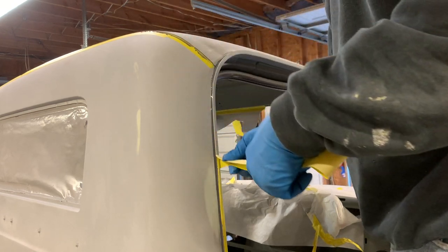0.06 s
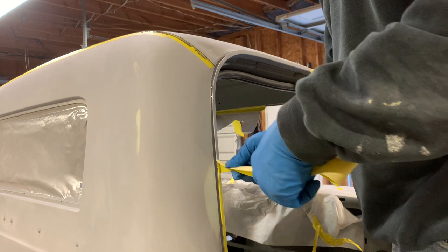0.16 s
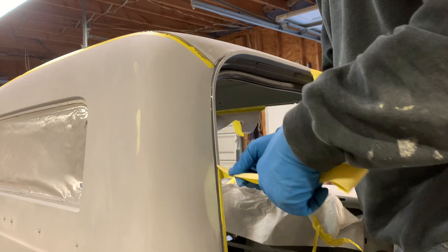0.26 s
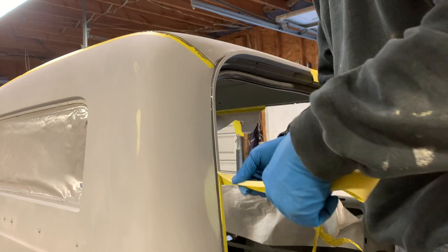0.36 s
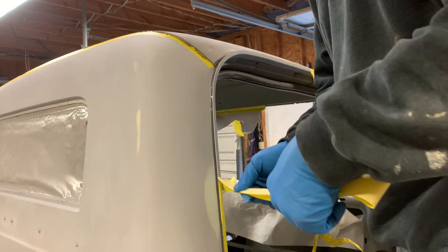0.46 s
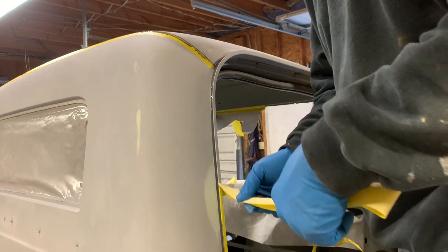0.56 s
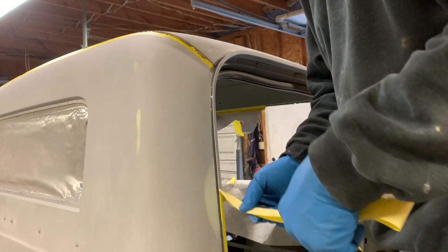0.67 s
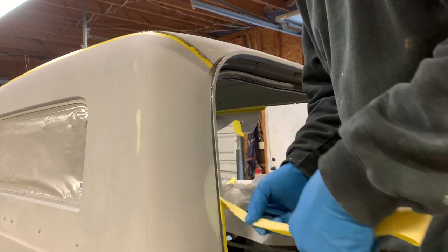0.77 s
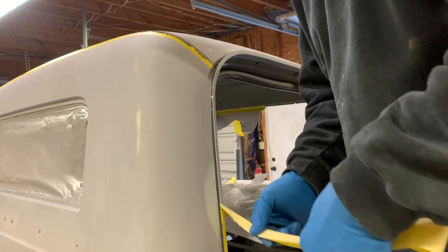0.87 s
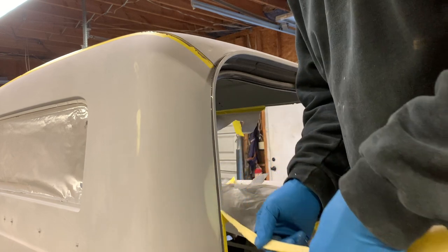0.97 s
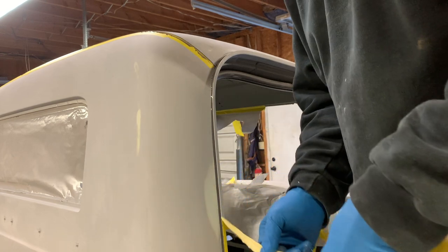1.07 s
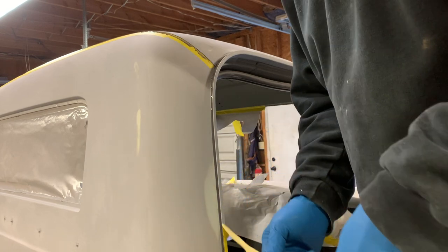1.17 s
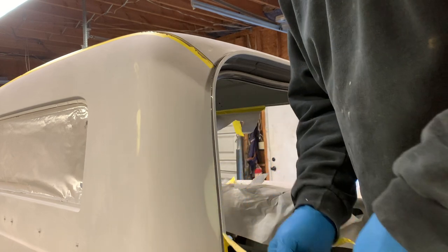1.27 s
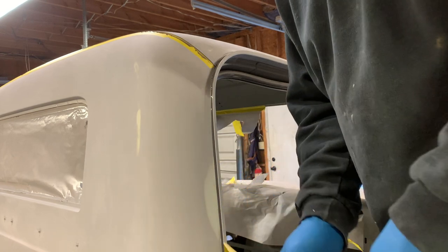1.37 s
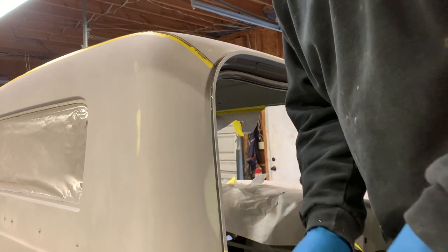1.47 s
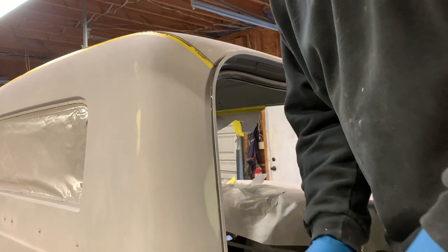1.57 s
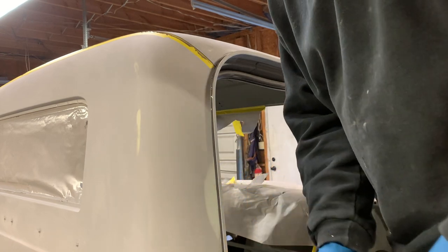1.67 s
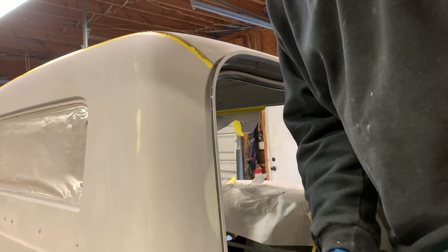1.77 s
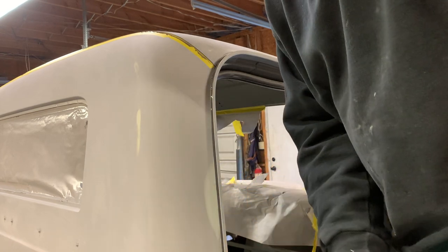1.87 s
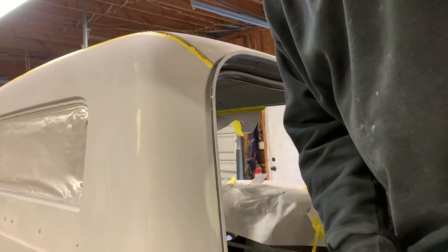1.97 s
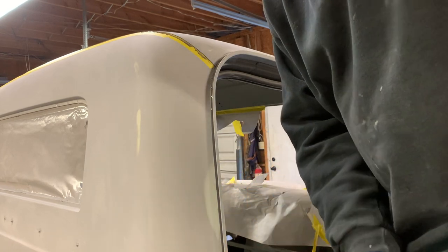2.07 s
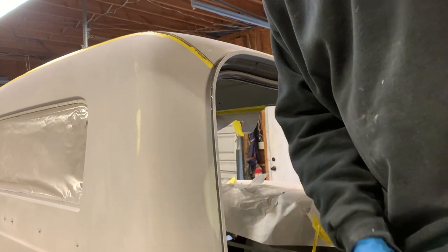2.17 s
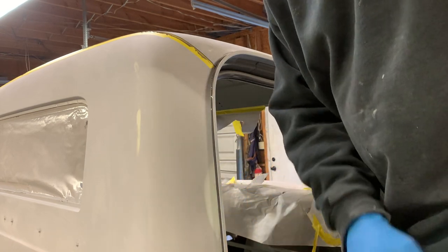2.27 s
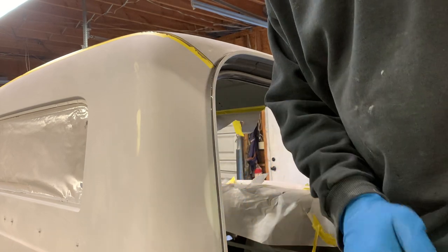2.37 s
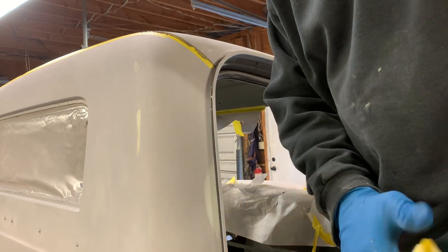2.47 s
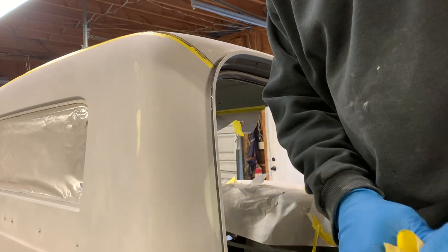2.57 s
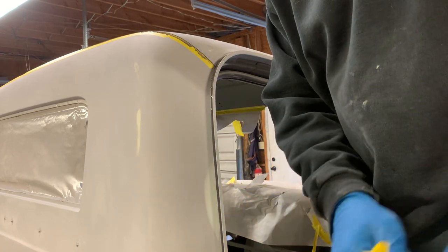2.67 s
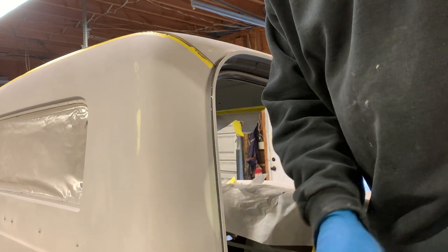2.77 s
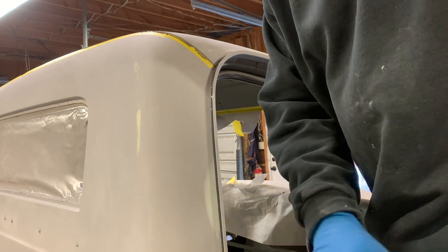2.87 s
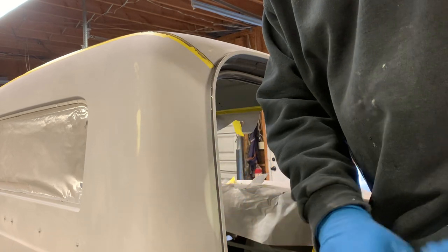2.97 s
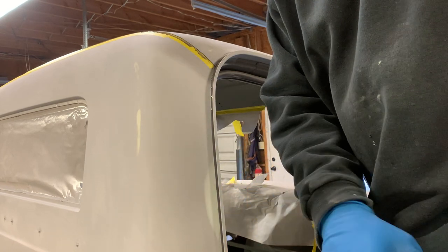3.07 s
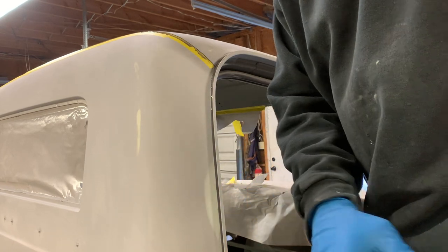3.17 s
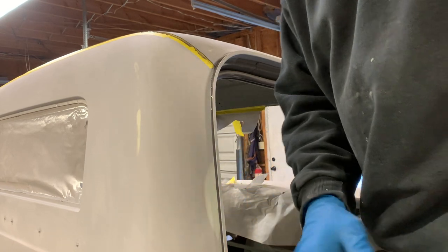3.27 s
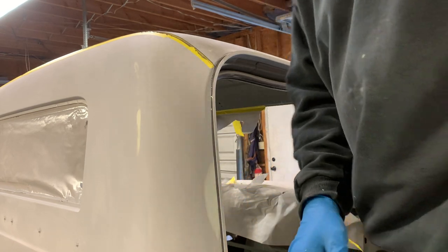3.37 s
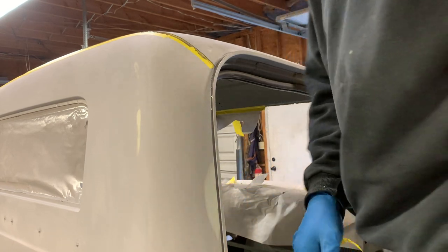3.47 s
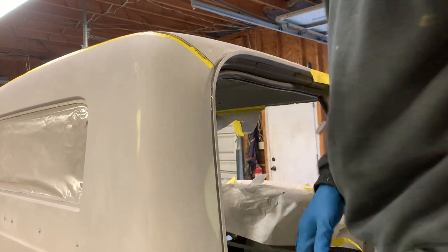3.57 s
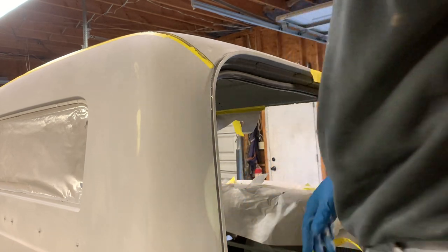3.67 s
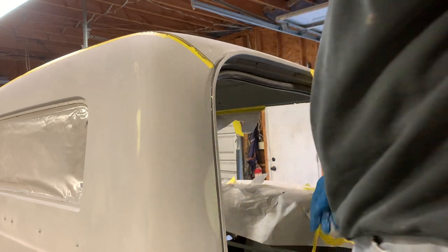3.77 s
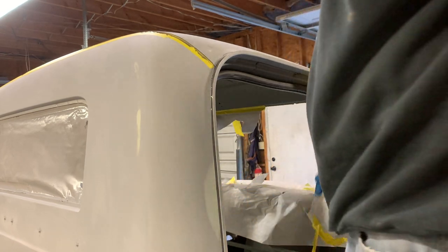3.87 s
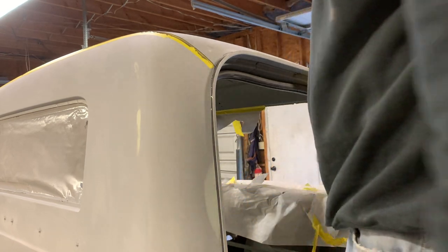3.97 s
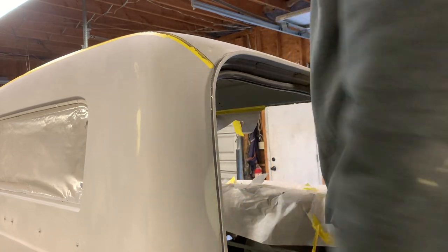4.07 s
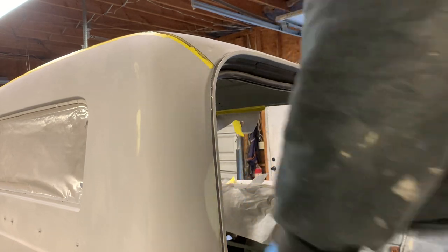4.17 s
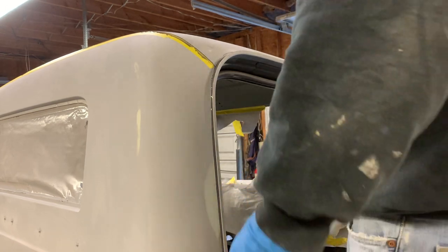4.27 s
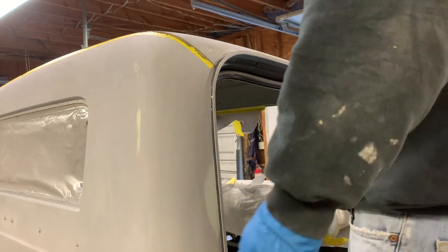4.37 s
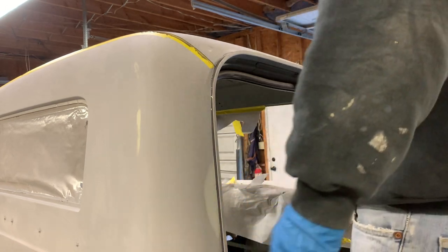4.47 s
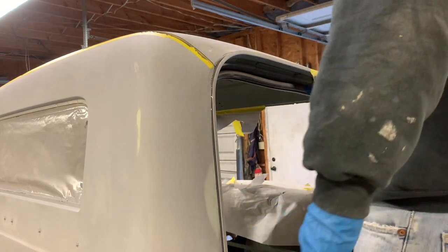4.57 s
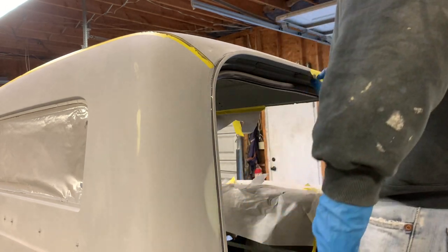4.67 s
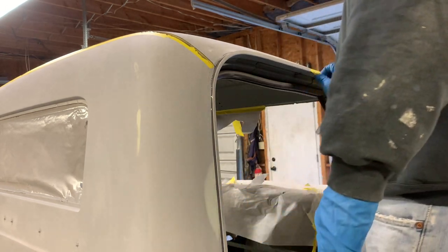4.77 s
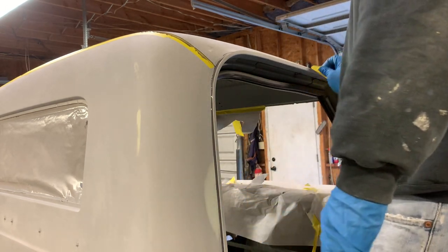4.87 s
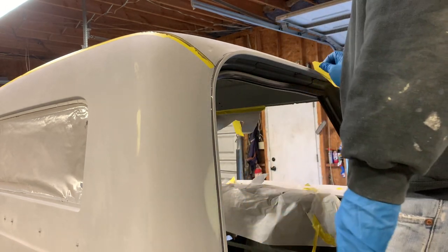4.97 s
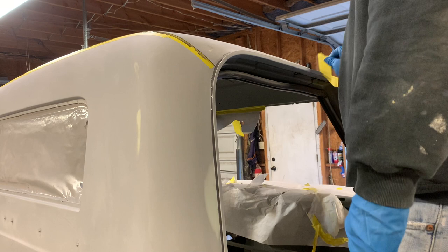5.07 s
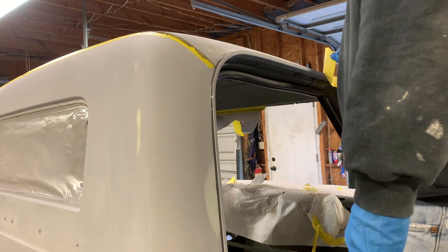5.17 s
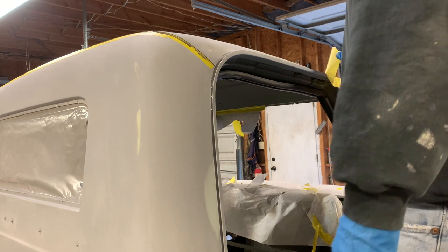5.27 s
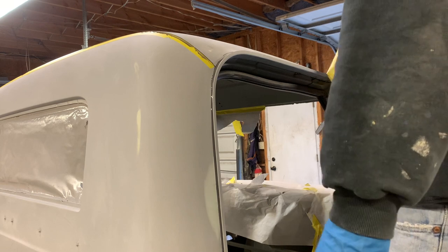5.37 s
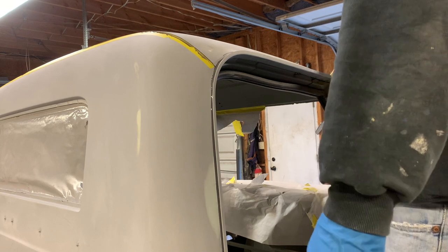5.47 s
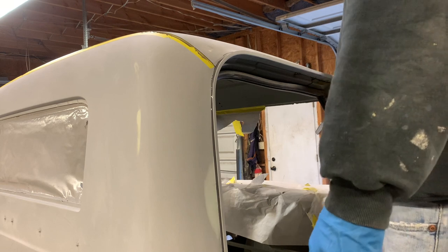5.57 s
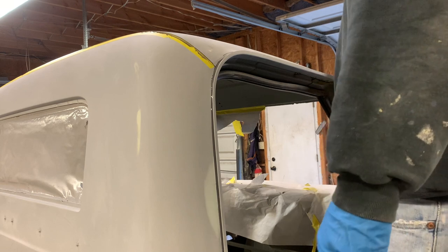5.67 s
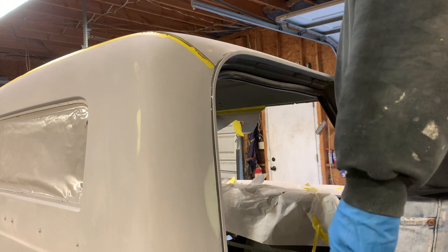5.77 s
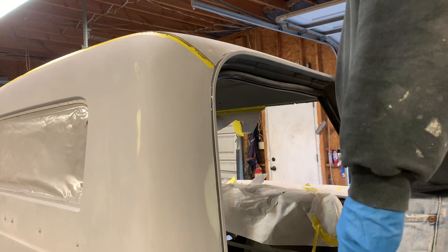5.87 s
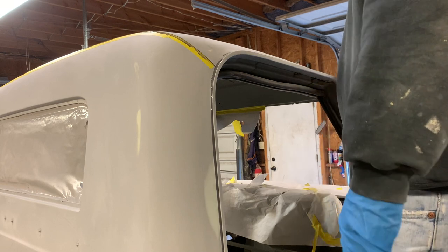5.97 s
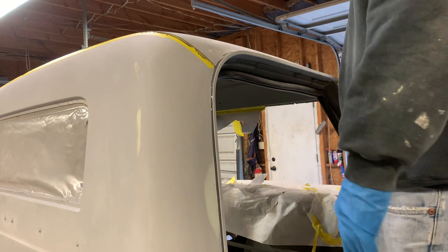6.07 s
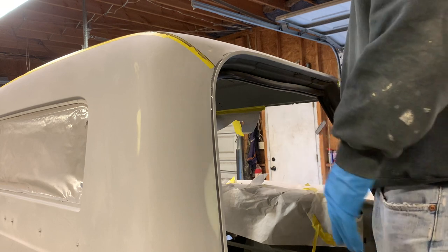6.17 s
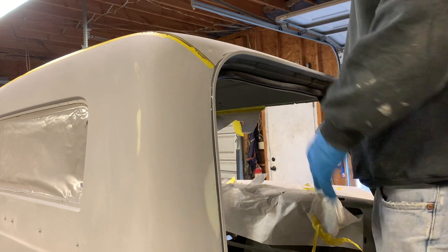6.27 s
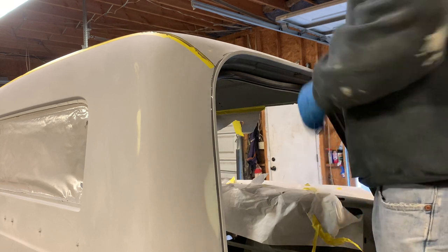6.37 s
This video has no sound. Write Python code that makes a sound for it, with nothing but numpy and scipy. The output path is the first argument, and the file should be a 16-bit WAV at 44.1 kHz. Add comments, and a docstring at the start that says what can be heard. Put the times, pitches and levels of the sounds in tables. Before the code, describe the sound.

Tape adhesive releases in a dense, dry hiss over papery rasping and low panel rumble, close to the microphones. The pull ends abruptly; loud creases pop and the wad crackles in bursts. The action thins to cloth rustles, tiny rips and a faint footfall. Then several short ripping pulls come, the last brightest, followed by two dull knocks. A low hum swells and fades beneath, with short room reflections.

```python
"""A low hum fills a workshop while masking tape is peeled off the door frame of a steel truck cab.
The glue lets go in a dense fizz that rumbles the panel; creases snap and some tape rips free in short bursts.
From about 1.9 s a gloved hand crumples the tape, which crackles; soft brushes, a step and a faint glove squeak follow.
A second strip comes off in short pulls, and two dull knocks end the scene.
Sources are shaped noise, random tiny ruptures and ringing pulses, heard by two microphone ports with small lags."""
import sys
import numpy as np
from scipy import signal
from scipy.fft import rfft, irfft, next_fast_len
from scipy.io import wavfile
from scipy.ndimage import uniform_filter1d

SR = 44100
rng = np.random.default_rng(int(sys.argv[2]) if len(sys.argv) > 2 else 0)


def generate_wav(signal):
    """Clip the signal to [-1, 1] and save it as 16-bit WAV at the path in sys.argv[1]."""
    frames = np.transpose(np.atleast_2d(signal))
    scaled = np.clip(frames, -1, 1) * 32767
    pcm = np.round(scaled).astype(np.int16)
    wavfile.write(sys.argv[1], SR, pcm)


N = 283563
T = np.arange(N) / SR
WIDENING_LAG_S = .000295  # lag of the widened treble, also used for the fizz of the glue


def amp(db):
    """Turns decibels into a gain."""
    return 10 ** (np.asarray(db) / 20)


def unit(x):
    """Scales a sound to rms 1."""
    return x / np.sqrt(np.mean(x ** 2) + 1e-20)


def read(points, hz):
    """Reads a table of (pitch, value) between its points, on a log-frequency axis."""
    f, value = np.transpose(points)
    return np.interp(np.log(hz + 1), np.log(f + 1), value)


def level(rows):
    """Turns a dB curve into a gain for every sample, silent outside its span."""
    s, db = np.transpose(rows)
    return amp(np.interp(T, s, db, left=-200, right=-200))


def add(mix, s, sound):
    """Adds a stereo sound to the mix at time s."""
    part = mix[:, round(s * SR):][:, :sound.shape[1]]
    part += sound[:, :part.shape[1]]


def colour(x, points):
    """Filters a sound with a spectrum table."""
    return irfft(rfft(x) * amp(read(points, np.fft.rfftfreq(N, 1 / SR))), N)


def click(db_at, size=2048):
    """Makes the sharpest pulse with a given spectrum that does not start early, of energy 1."""
    log_gain = np.log(amp(db_at(abs(np.fft.fftfreq(size, 1 / SR)))))
    pulse = np.fft.ifft(np.exp(np.conj(signal.hilbert(log_gain)))).real
    return pulse / np.linalg.norm(pulse)


def ports(x, lag):
    """Sound from the right reaches the left port late (lag in s); a negative lag delays the right port."""
    size = next_fast_len(len(x) + 64)
    delay = np.exp(-2j * np.pi * np.fft.rfftfreq(size, 1 / SR) * abs(lag))
    late = irfft(rfft(x, size) * delay, size)[:len(x)]
    return np.array([late, x] if lag > 0 else [x, late])


def wander(rate):
    """A random curve of rms 1 with straight lines between its points, rate points per second."""
    knots = rng.standard_normal(4096)
    return unit(np.interp(T * rate, np.arange(len(knots)), knots))


def grains(per_s, spread_db):
    """Random tiny ruptures, a few much larger than the rest."""
    size = amp(spread_db * np.minimum(rng.exponential(1, N), 4.5))
    return size * rng.choice([-1, 1], N) * (rng.random(N) < per_s / SR)


def crinkle(train, width, count=16):
    """Each rupture rings its own small patch of paper for a few cycles."""
    patch = rng.integers(0, count, N)
    pitches = np.linspace(200 ** .5, 14000 ** .5, count) ** 2
    out = np.zeros(N)
    for k, hz in enumerate(pitches):
        b, a = signal.iirpeak(hz, np.sqrt(hz) / width, SR)
        out += signal.lfilter(b, a, train * (patch == k))
    return out


def resonate(x, hz, width):
    """A resonance that follows the pitch hz, which may be a curve; width is in Hz."""
    turn = np.exp(2j * np.pi * np.cumsum(hz * np.ones(len(x))) / SR)
    r = np.exp(-np.pi * width / SR)
    for _ in range(2):
        x = turn * signal.lfilter([1 - r], [1, -r], x / turn)
    return x.real


def bump(hz, centre, half_width):
    """The shape of a resonance, of height 1."""
    return 1 / (1 + ((hz - centre) / half_width) ** 2)


def burst(decay, rise, hold=0, size=4096, count=3):
    """A short, dying rush of noise whose energy is spread evenly over all pitches."""
    t = np.arange(size) / SR
    envelope = (1 - np.exp(-t / rise)) * np.exp(-np.maximum(t - hold, 0) / decay)
    x = rng.standard_normal(size) * envelope
    for _ in range(count):
        # even out the pitches, then restore the shape in time
        z = rfft(x)
        x = irfft(z / (abs(z) + 1e-12), size)
        x *= envelope / np.sqrt(abs(uniform_filter1d(x ** 2, 128)) + 1e-12)
    return x


def stroke(start, length, attack, release):
    """One move of the hand: rises, holds, and dies away."""
    rise = np.clip((T - start) / attack, 0, 1)
    return rise * np.exp(-np.clip((T - start - length) / release, 0, 30))


# how the hum swells: time_s, level_db (rms)
HUM_SWELL = [(0, -54.5), (1.0, -48.5), (2.0, -47), (2.25, -51), (2.45, -49), (3.15, -58.5), (3.5, -70),
             (5.1, -76), (5.6, -63), (6.1, -55), (6.43, -63)]
# steady-pitched lines above the hum: pitch_hz, level_db (before they waver and swell)
HUM_LINES = [(82, -57.5), (247.6, -71.5), (333.8, -62.5)]
# the air of the workshop: pitch_hz, relative level_db (per Hz)
AIR_SPECTRUM = [(20, -21), (30, 2.5), (42, -3.5), (75, 10.5), (130, -4), (280, -8.5), (550, -11.5),
                (1400, -11), (2500, -15.5), (5000, -19), (10000, -18.5), (14000, -21), (15500, -38)]
LINE_WAVER_DB, LINE_SWELL = 2.5, .5  # how much the lines waver; power of the hum's swell they follow


def background():
    """A wavering hum, whose upper lines swell a little with it, over the noise of the workshop air."""
    swell = level(HUM_SWELL)
    hum = swell * amp(2.7 * wander(7.7)) * np.sin(2 * np.pi * (58.2 * T + 0.21 * wander(5.4)))
    lines = np.zeros(N)
    for hz, db in HUM_LINES:
        gain = amp(db + LINE_WAVER_DB * wander(5.5))
        lines += gain * np.sin(2 * np.pi * (hz * T + 0.23 * wander(9)))
    left, right, both = unit(colour(rng.standard_normal((3, N)), AIR_SPECTRUM))
    air = amp(-64.5) * (both + 1.35 * np.array([left, right]))
    return np.sqrt(2) * (hum + lines * unit(swell) ** LINE_SWELL) + air


PULL_ATTACK_S = 0.012  # both strips


def long_pull():
    """The first pull is under way from the start, holds evenly and lets go at 1.849 s."""
    return stroke(-1.1, 2.949, PULL_ATTACK_S, release=0.019)


# breaking glue, both strips: pitch_hz, relative level_db (per Hz)
FIZZ_SPECTRUM = [(500, -9), (3000, -5.5), (6300, 4.5), (8300, 12.5), (13700, 10.5), (16000, -32)]


def peel(rasp_gain, fizz_gain, rasp_spectrum, per_s, uneven_db, fizz_db, rasp_db, lag):
    """Glue threads break in a dense fizz; the paper rasps in small tears; the peel front moves unevenly."""
    grip = amp(uneven_db * wander(110))
    fizz = unit(colour(grains(per_s, 3.0), FIZZ_SPECTRUM))
    fizz = fizz * fizz_gain * amp(fizz_db + wander(35))
    rasp = unit(colour(crinkle(grains(per_s, 3.0), width=14.0), rasp_spectrum))
    rasp = rasp * rasp_gain * amp(rasp_db + 1.63 * wander(50))
    return ports(fizz * grip, WIDENING_LAG_S) + ports(rasp * grip, lag)


# the fizz dims overall as the peel front slides down the pillar: time_s, level_db (before fizz_db below)
FIRST_FIZZ = [(0, -35.5), (.1, -33), (.18, -40.5), (.3, -34.5), (.5, -40), (1.0, -39.5), (1.9, -43)]
# rasp of the first strip's paper: pitch_hz, relative level_db (per Hz)
FIRST_RASP_SPECTRUM = [(100, 16), (300, 8.5), (600, 5.5), (1400, 1.5), (2300, -0.5), (3300, 1), (4500, 0.5),
                       (6500, -2.5), (10000, -33)]


def first_strip():
    """The glue and paper of the first strip give way in one long, even pull."""
    pull = long_pull()
    return peel(pull * amp(-49), pull * level(FIRST_FIZZ), FIRST_RASP_SPECTRUM, per_s=4200,
                uneven_db=0.9, fizz_db=-3.5, rasp_db=1.5, lag=-0.000078)


# gliding resonances of the taut tape, one curve each: time_s, pitch_hz, level_db
TAPE_GLIDES = [
    [(0, 1600, -49.5), (.3, 1770, -64.5), (.5, 2200, -56), (.74, 2030, -54.5), (.92, 1900, -74)],
    [(.65, 3400, -59), (.82, 3650, -56), (1.03, 3530, -54), (1.12, 3300, -54), (1.22, 3200, -74)],
    [(5.46, 1080, -49.5), (5.63, 1290, -67), (5.78, 2320, -49), (5.86, 3430, -39), (5.93, 3620, -57)],
]
# width_hz of each of those resonances; the last, for the second strip, is the more damped
TAPE_WIDTHS = [700, 800, 1800]
# where the hands are, for the taut tape, snaps and rips: time_s, left_lag_s (negative: right port late)
HAND_PLACES = [(1.8, -.00003), (2.1, .00007), (3.3, .00008), (5.8, .00002)]


def hand_lag(s):
    """Reads the lag between the ports for the place of the hands at time s."""
    return np.interp(s, *np.transpose(HAND_PLACES))


def taut_tape():
    """Breaking glue threads ring the taut tape, gliding as the pull and its free length change."""
    out = np.zeros((2, N))
    for curve, width in zip(TAPE_GLIDES, TAPE_WIDTHS):
        s, hz, db = np.transpose(curve)
        ring = resonate(grains(4000, 3), np.interp(T, s, hz), width)
        out += ports(unit(ring) * level(np.transpose([s, db])), hand_lag(s[0]))
    return out


def panel(modes, gain, top_hz):
    """Noise for the uneven push drives the low resonances of the sheet steel."""
    hz = np.fft.rfftfreq(N, 1 / SR)
    power = sum(amp(db) ** 2 * bump(hz, f, width / 2) for f, width, db in modes)
    # weaken what lies above top_hz and below 45 Hz
    shape = np.sqrt(power / (1 + (hz / top_hz) ** 6) / (1 + (45 / (hz + 1)) ** 8))
    both, apart = unit(irfft(rfft(rng.standard_normal((2, N))) * shape, N))
    return (both + amp(-15.0) * apart * np.array([[1], [-1]])) * gain


# how hard the first pull shakes the pillar: time_s, level_db (before a 0.6 dB cut)
FIRST_SHAKE = [(0.0, -50), (0.43, -40), (0.75, -45.5), (0.79, -36.5), (0.86, -43), (1.12, -39),
               (1.87, -39.5), (2.27, -60), (2.3, -55)]
# panel resonances under the first strip, also used by the sway: pitch_hz, width_hz, relative level_db
NEAR_PANEL_MODES = [(84.4, 6.8, 3.5), (131, 6.2, -12), (124, 12, -10), (161, 6.3, 5), (176, 34, 1),
                    (215.3, 7.1, 2.5), (254.2, 6.4, -2.5), (360, 75, -15)]


def near_rumble():
    """The panel rumbles under the first strip."""
    return panel(NEAR_PANEL_MODES, level(FIRST_SHAKE) * amp(-0.6), top_hz=420)


PANEL_ATTACK_S, PANEL_RELEASE_S = 0.03, 0.23


def jostling(thump_release=0.074, knock_release=0.023):
    """How much squeezes, knocks and steady leaning shake the cab (before the far panel's 6 dB cut)."""
    knocked = np.zeros(N)
    for s, db, _ in KNOCKS_AT:
        knocked += stroke(s, PANEL_ATTACK_S, PANEL_ATTACK_S, knock_release) * amp(db - 27)
    squeezed = squeezing(PANEL_ATTACK_S, thump_release) * amp(-9.5)
    leaning = amp(-56)
    return np.hypot(squeezed + knocked, leaning)


# panel resonances further along the frame: pitch_hz, width_hz, relative level_db
FAR_MODES = [(79.2, 14, 0.5), (140, 77, -2.5), (185, 17, -6), (250.6, 15, 5), (286, 35, -6),
             (323.5, 10.5, 0.5), (433, 340, -7)]


def far_rumble(far_shake):
    """The panel further along rumbles from the second strip and from jostling."""
    return panel(FAR_MODES, np.hypot(far_shake, jostling()) * amp(-6), top_hz=475)


# creases that buckle: start_s, level_db (before a 17 dB boost), ring_hz,
# body_db and fizz_db (tilt of the spectrum), clatter_db (against the first buckle)
SNAPS_AT = [(0.278, -34, 1670, 12, -14, 6), (1.6155, -16.5, 1970, 7.5, 6, -9),
            (1.7966, -19, 3720, 4, 3.5, -14), (1.8198, -28, 5040, 8, -5, 3), (2.077, -21, 4630, -2, 4.5, 0),
            (2.3945, -31, 2300, 11, -8, 0), (2.4238, -28, 2370, 11, -2, -2), (2.4288, -23, 3500, 7.5, 1, 2),
            (2.4714, -21, 3220, 4, -8, -3), (2.4738, -19, 1150, 1.5, -3, -1), (2.478, -28, 1700, 6, -2, 1),
            (2.4912, -14.5, 3000, -8, 3, -15), (2.4972, -26, 2300, -3, -4, -3),
            (2.514, -25, 1000, 5, -1, 6), (2.5818, -25, 1660, 2, -3, 1), (2.622, -27.5, 2110, 6, -10, 1),
            (2.6685, -26, 2000, 7, -9, 6), (2.677, -27, 880, 3, -9, 10), (2.6882, -7.5, 3320, -11, -2, -13),
            (2.704, -28, 1870, -1, -1, 1), (2.7452, -17.5, 6500, 2.5, 4, 6),
            (2.7708, -11.5, 2240, -5, -6.5, -6), (3.04, -30, 1530, 0, -12, 3), (3.067, -22, 7340, 1, 4, -1),
            (3.083, -20, 5200, -4, 7, -2), (3.0968, -19, 1870, 0, -10, -5),
            (3.1118, -20, 2170, -7, -12, -3), (3.1155, -18.5, 1250, -5, -14, 1),
            (3.1485, -28, 1250, -3, -8, -4), (3.1645, -23.5, 2010, 7, -11, -2),
            (3.2596, -18, 2500, -6.5, -9.5, -7), (3.379, -32, 2500, 10, -3, 3),
            (3.414, -30, 6200, -14, -7, 6), (3.432, -22.5, 6130, -11, -7.5, -10),
            (3.706, -38, 3300, -8, -11, 6), (3.711, -40, 5500, -12, -2, 7),
            (3.715, -27.5, 5450, -24, -3.5, -0.5), (4.0972, -34, 2250, 10, -11, -8),
            (5.11, -30, 4850, 2, -11, 1), (5.7718, -23, 2100, -10, -13, -4)]
RING_DB, RING_WIDTH = 11, 0.25  # height of a crease's ring; half width as a share of its pitch
ROOM_RING_DB = 8  # heard from all sides, the ring stands out less
OVERTONE_RATIO, OVERTONE_DB = 3.4, 4.5  # a crease's second resonance
HOLLOW_RATIO, HOLLOW_DB = 2.48, -4.5  # the hollow between the two
CAB_ECHO_S, CAB_ECHO_DB = 0.0093, -18.5  # the side of the cab throws each snap back


def snaps(ring_db):
    """A crease buckles: a sharp pulse rings a patch of tape for a few cycles, and smaller folds clatter."""
    out = np.zeros((2, N))
    for s, db, ring_hz, body_db, fizz_db, clatter_db in SNAPS_AT:
        rings = [(ring_hz, ring_db), (ring_hz * HOLLOW_RATIO, HOLLOW_DB),
                 (ring_hz * OVERTONE_RATIO, OVERTONE_DB)]
        slope = [(100, body_db - 24.5), (400, body_db - 9.5), (660, body_db + 0.5), (1000, body_db - 4.0),
                 (3000, -3.0), (10000, fizz_db), (16000, fizz_db - 10.5)]

        def snap_db(hz):
            """The sloping spectrum of the snap with its resonances."""
            return read(slope, hz) + sum(height * bump(hz, f, RING_WIDTH * f) for f, height in rings)

        buckle = burst(0.00026, rise=.0001, size=1024)
        clatter = burst(0.0026, rise=0.00055, size=1024)
        buckle[0] = np.linalg.norm(buckle)  # the first give is the sharpest
        force = unit(buckle) + amp(clatter_db) * unit(clatter)
        force = force / np.linalg.norm(force)
        snap = ports(signal.fftconvolve(click(snap_db), force) * amp(db + 17.0), hand_lag(s))
        add(out, s, snap)
        add(out, s + CAB_ECHO_S, snap * amp(CAB_ECHO_DB))
    return out


# the cab sways under a leaning body: start_s, length_s, level_db
SWAYS_AT = [(1.173, 0.087, -39.5), (3.03, 0.065, -49.5), (3.94, 0.32, -54.5), (4.897, 0.051, -64),
            (5.598, 0.29, -46.5), (5.96, 0.26, -48)]


def sway():
    """A slow push rumbles mostly in the lowest resonance of the panel."""
    push = np.zeros(N)
    for s, length, db in SWAYS_AT:
        push += stroke(s, length, attack=0.021, release=0.11) * amp(db)
    return panel(NEAR_PANEL_MODES, push, top_hz=75)


# tape coming free at once: start_s, level_db (before a 6 dB boost), body_db and fizz_db (tilt of the
# spectrum), length_s, lower_peak_hz, upper_peak_hz
RIPS_AT = [(1.4327, -30, -7, 0, 0.0054, 3570, 7450), (2.9147, -27, -11, -5, 0.0069, 2800, 3490),
           (3.371, -42, -11, -5, 0.0059, 2407, 4840), (3.4624, -45.5, -3, -10.5, .008, 2060, 3740),
           (4.0307, -31.5, 1, -10.5, 0.0042, 1430, 3070), (4.7153, -34, -7.5, -4.5, 0.0092, 1900, 4050),
           (5.686, -47, 1, -17, 0.0184, 1310, 1880), (5.977, -39, -5.5, -4.5, 0.0072, 1200, 3750)]
RIP_ATTACK_S, RIP_RELEASE_S = 0.00073, 0.00187
RIP_PEAK_DB, RIP_PEAK_WIDTH_HZ = 7, 126  # two narrow pitches stand out in each burst
RIP_BASS_DB = -8  # bass against the body
RIP_LEAD_DB, RIP_LEAD_S = -26, 0.0087  # a faint noise swells into each burst


def rips():
    """A faint swell of noise, then a burst of a few milliseconds as the tape comes free at once."""
    out, age = np.zeros((2, N)), np.arange(2048) / SR
    for s, db, body_db, fizz_db, length, *peaks in RIPS_AT:
        bass_db = body_db + RIP_BASS_DB
        slope = [(80, bass_db - 29), (320, bass_db), (950, body_db), (2000, 0), (4200, 0.004),
                 (7000, fizz_db + 4.0), (9500, fizz_db + 7.5), (16000, fizz_db - 4.0)]

        def rip_db(hz):
            """The sloping spectrum of the rip with its two narrow peaks."""
            return read(slope, hz) + RIP_PEAK_DB * sum(bump(hz, f, RIP_PEAK_WIDTH_HZ / 2) for f in peaks)

        swell = np.exp(-age[::-1] / RIP_LEAD_S)  # grows until the burst
        lead = rng.standard_normal(len(age)) * swell * amp(RIP_LEAD_DB)
        main = burst(RIP_RELEASE_S, RIP_ATTACK_S, hold=length)
        rush = signal.fftconvolve(np.concatenate([lead, main]), click(rip_db))
        add(out, s - len(age) / SR, ports(rush * amp(db + 6.0), hand_lag(s)))
    return out


# the hand squeezes the wad of tape: start_s, length_s, level_db (before the crackle's or thump's cut)
SQUEEZES_AT = [(1.931, 0.32, -47.5), (2.05, 0.81, -49.5), (2.408, 0.035, -31.5), (2.468, 0.006, -25),
               (2.483, 0.021, -28.5), (2.57, 0.076, -32.5), (2.648, 0.04, -30.5), (2.714, 0.045, -37),
               (3.007, .06, -39.5), (3.059, 0.089, -28), (3.229, 0.036, -33), (3.313, 0.17, -42.5),
               (4.042, 0.062, -42.5), (4.187, 0.01, -40.5), (5.768, 0.12, -33.5)]


def squeezing(attack, release):
    """The effort of the hand on the wad; the strongest squeeze counts at each moment."""
    return np.max([stroke(s, length, attack, release) * amp(db) for s, length, db in SQUEEZES_AT], axis=0)


# crackle of the wad: pitch_hz, relative level_db (per Hz)
WAD_SPECTRUM = [(80, -4), (250, 2), (600, -4), (1300, -2), (2100, -2.5), (3600, 2.5), (4800, -1), (7400, 0),
                (8800, -2.5), (13500, -4.5), (16000, -26.5)]
HAND_SPREAD_S = .00004  # the wad's two ends differ this much in lag from its middle


def crumple():
    """Small creases, each with its own pitch, give way in clumps at both ends of the squeezed wad."""
    effort, out = squeezing(attack=0.0064, release=0.022), np.zeros((2, N))
    for end in (-1, 1):
        creases = grains(2800, 3.05) * amp(3.8 * wander(160))
        crackle = unit(colour(crinkle(creases, width=17.5), WAD_SPECTRUM))
        out += ports(crackle * effort * amp(-8.5), .00006 + end * HAND_SPREAD_S)
    return out


# faint brushes of cloth and tape: middle_s, level_db (at the middle), length_s (of the swell), pitch_hz
BRUSHES_AT = [(3.12, -45, 0.033, 400), (3.384, -57, 0.28, 317), (4.071, -39, 0.052, 2200),
              (4.205, -51, 0.068, 564), (4.871, -44, 0.017, 1180), (4.937, -46, 0.017, 890),
              (5.12, -48.5, 0.13, 420), (5.126, -42.5, 0.017, 2580)]


def brushes():
    """Soft swells of grainy friction, each around a broad pitch."""
    sound = np.zeros(N)
    for s, db, length, hz in BRUSHES_AT:
        swell = np.exp(-np.minimum(((T - s) / length) ** 2 * 2, 50))
        sound += unit(resonate(grains(5000, 2.0), hz, hz * 1.8)) * amp(db) * swell
    return ports(sound, 0.00016)


def step(s=4.193, db=-38, decay=0.016):
    """A soft footfall: a few low cycles of two tones."""
    out, t = np.zeros((2, N)), np.arange(8192) / SR
    thud = np.sin(2 * np.pi * 135 * t) + 0.8 * np.sin(2 * np.pi * 200 * t)
    envelope = t / decay * np.exp(1 - 2 * t / decay) * 2
    add(out, s, ports(amp(db) * thud * envelope, .0001))
    return out


def squeak(start=4.385, length=0.026, hz=1525, db=-66, octave_db=-3):
    """The rubber glove slips with a faint, fuzzy squeak: grains ring at a pitch and its octave."""
    slip = grains(3000, 2)
    tone = unit(resonate(slip, hz, 200)) + amp(octave_db) * unit(resonate(slip, 2 * hz, 240))
    return ports(tone * stroke(start, length, 0.0096, 0.03) * amp(db), .0001)


# pulls on the second strip: start_s, length_s, rasp_db, fizz_db, panel_db (all before the trims that follow)
PULLS_AT = [(4.844, 0.1, -48, -43, -43.5), (5.046, 0.036, -37, -35.5, -43.5),
            (5.31, 0.046, -51.5, -51, -44.5), (5.448, 0.14, -44, -44, -37.5),
            (5.605, 0.18, -47, -46.5, -39.5), (5.755, 0.092, -40, -32.5, -43)]
PULL_RELEASE_S = 0.037
CREEP_DB = -53  # the taut tape keeps creeping between pulls (before the same trims)


def short_pulls():
    """Gains of the rasp and the fizz of the second strip, and of the panel that it shakes."""
    first, last = PULLS_AT[0][0], PULLS_AT[-1][0]
    rasp = fizz = amp(CREEP_DB) * stroke(first, last - first, PULL_ATTACK_S, PULL_RELEASE_S)
    shake = np.zeros(N)
    for s, length, rasp_db, fizz_db, panel_db in PULLS_AT:
        pull = stroke(s, length, PULL_ATTACK_S, PULL_RELEASE_S)
        rasp = np.maximum(rasp, pull * amp(rasp_db))
        fizz = np.maximum(fizz, pull * amp(fizz_db))
        shake = np.maximum(shake, stroke(s, length, PANEL_ATTACK_S, PANEL_RELEASE_S) * amp(panel_db))
    return rasp, fizz, shake


# rasp of the second strip's paper: pitch_hz, relative level_db (per Hz)
SECOND_RASP_SPECTRUM = [(100, 3), (330, 10), (750, 1.5), (1100, 3), (1400, 4), (2200, 4), (3300, 0.5),
                        (4700, 0.5), (6500, -3), (10000, -12)]


def second_strip(rasp, fizz):
    """The glue and paper of the second strip give way in short pulls."""
    return peel(rasp, fizz, SECOND_RASP_SPECTRUM, per_s=3600,
                uneven_db=1.0, fizz_db=-7.0, rasp_db=-5.0, lag=.00002)


# dull knocks: start_s, level_db, brightness_db (of the blow at 4000 Hz)
KNOCKS_AT = [(6.116, -33.5, 16), (6.2153, -22.5, -3)]
# broad resonances of the knocked thing: pitch_hz, width_hz, relative level_db
KNOCKED_MODES = [(310, 21, 5), (624, 95, -4.5), (884, 59, -4.5), (1140, 180, -1.5), (1970, 280, -7.5),
                 (2840, 280, -14), (4000, 720, -15.5)]


def knocks(decay=0.0087):
    """A short scraping blow excites broad, well damped resonances."""
    out = np.zeros((2, N))
    for s, db, bright_db in KNOCKS_AT:
        tilt = [(100, -22), (600, -3.0), (4000, bright_db), (7000, -1.5), (16000, -8.0)]

        def body_db(hz):
            """The sum of the resonances, tilted by the hardness of the blow."""
            power = sum(amp(d) ** 2 * bump(hz, f, width / 2) for f, width, d in KNOCKED_MODES)
            return 10 * np.log10(power + amp(-21.0) ** 2) + read(tilt, hz)

        blow = signal.fftconvolve(burst(decay, rise=0.00024), click(body_db))
        add(out, s, ports(blow * amp(db), 0.00011))
    return out


# how long the workshop's echoes take to fall by 60 dB: pitch_hz, decay_s
ROOM_DECAY = [(150, 0.57), (1000, 0.75), (3000, 0.6), (7000, 0.49), (14000, 0.041)]


def workshop(x, count=4):
    """Dense reflections, each band dying at its own speed; their pattern shifts nine times a second."""
    size = SR * 5 // 8
    taps = rng.standard_normal((count, 2, size))
    hz, t, z = signal.stft(taps, SR, nperseg=256)
    fading = z * amp(-60 * t / read(ROOM_DECAY, hz)[:, None])
    tails = signal.istft(fading, SR, nperseg=256)[1][..., :size]
    age = np.arange(size) / SR
    tails *= np.clip((age - .002) / 0.00082, 0, 1)
    tails *= 1 + 3.36 * np.exp(-age / 0.016)  # the cab answers first
    tails /= np.linalg.norm(tails, axis=2, keepdims=True)
    out = np.zeros((2, N))
    for k, tail in enumerate(tails):
        # each tail fades in and out in turn, overlapping the next
        place = (T * 9 + k) % count
        share = np.sin(np.pi / 2 * np.minimum(place, 2))
        out += signal.oaconvolve(x * share, tail, axes=1)[:, :N]
    return out


def scene():
    """Mixes the sources, most with their own share of the room; rumble, sway and background stay dry."""
    far_rasp, far_fizz, far_shake = short_pulls()
    # sound, level sent to the room in dB
    sources = [(first_strip() + taut_tape(), -5), (rips(), 1.2), (crumple(), -7), (brushes(), -1.5),
               (step(), -8), (squeak(), -3), (second_strip(far_rasp, far_fizz), -1), (knocks(), -1.5)]
    direct = snaps(RING_DB) + sum(x for x, wet_db in sources)
    send = snaps(ROOM_RING_DB) * amp(-9.0) + sum(x * amp(wet_db) for x, wet_db in sources)
    rumble = near_rumble() + far_rumble(far_shake)
    return direct + workshop(send) + rumble + sway() + background()


# treble copied late from the right channel into the left: pitch_hz, share_copied (0 to 1)
TREBLE_WIDENING = [(6800, 0), (9800, .7), (13000, .8)]
CEILING = 3.8  # amplitude that peaks bend toward
EDGE_HZ = 15800  # top of the band


def record(dry):
    """The treble is widened; peaks bend gently toward a ceiling; then the highest pitches are cut."""
    hz = np.fft.rfftfreq(N, 1 / SR)
    left, right = rfft(dry)
    share = read(TREBLE_WIDENING, hz)
    late_right = right * np.exp(-2j * np.pi * hz * WIDENING_LAG_S)
    left = (1 - share) * left + share * late_right
    balance = amp([[-.4], [.4]])
    pair = CEILING * np.tanh(irfft(np.array([left, right]), N) * balance / CEILING)
    low_pass = signal.firwin(511, EDGE_HZ, window=("kaiser", 9), fs=SR)
    return signal.oaconvolve(pair, low_pass[None], "same")


dry = scene()
out = record(dry)
generate_wav(out)
```